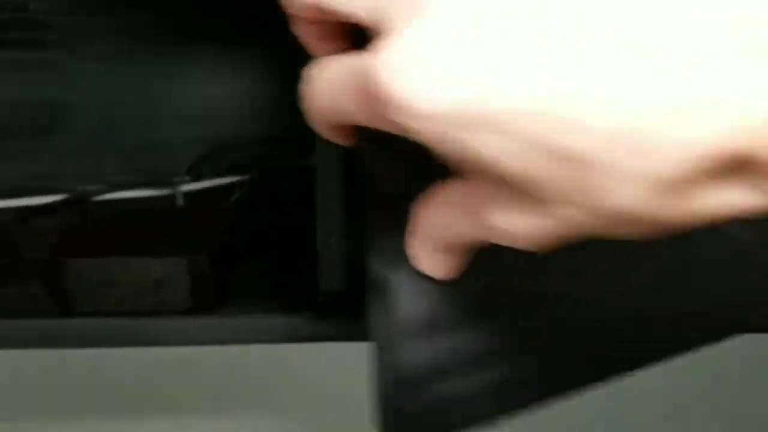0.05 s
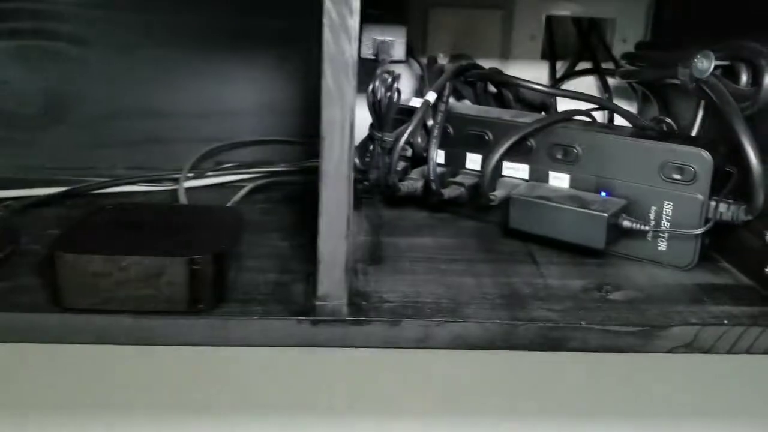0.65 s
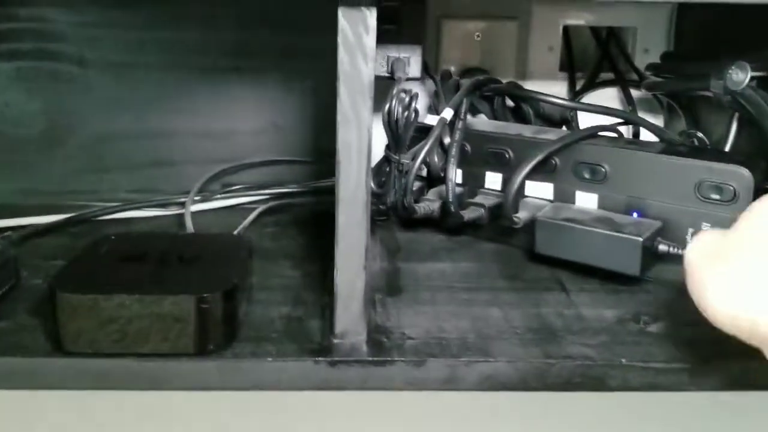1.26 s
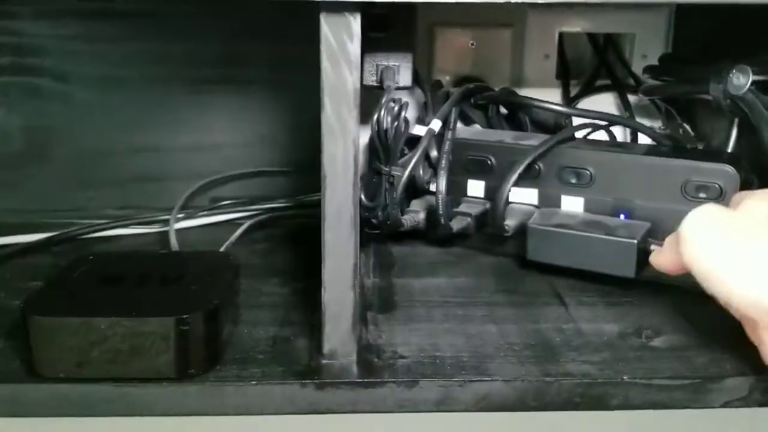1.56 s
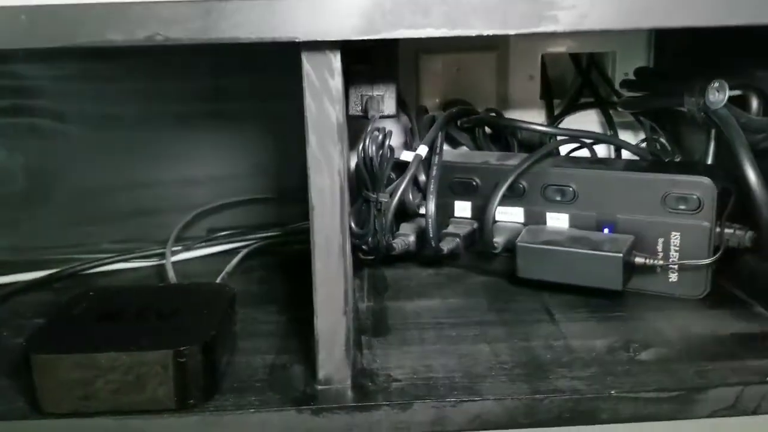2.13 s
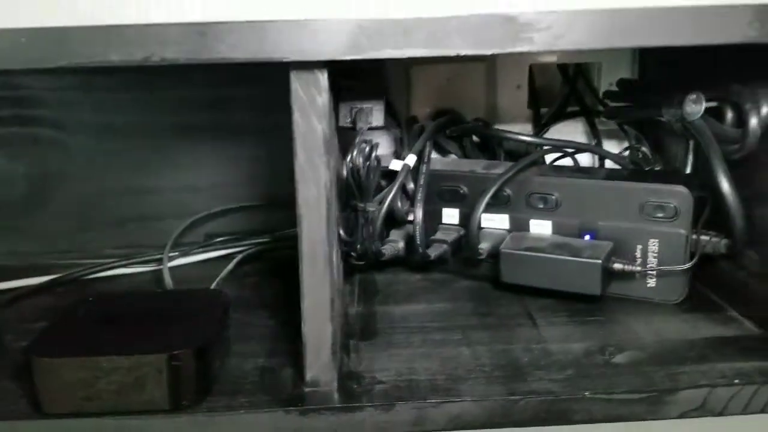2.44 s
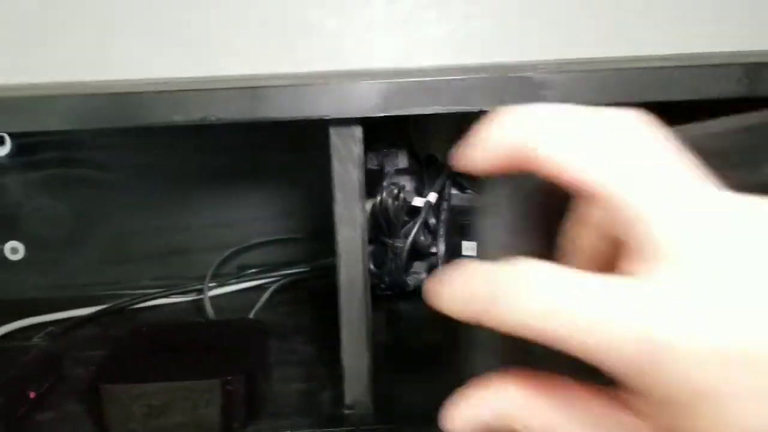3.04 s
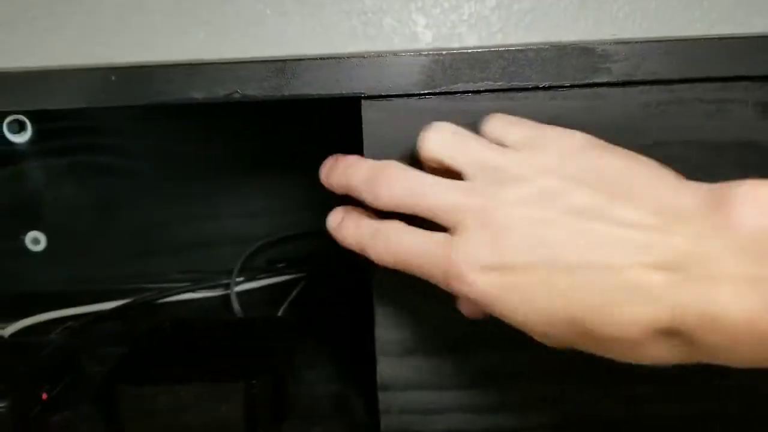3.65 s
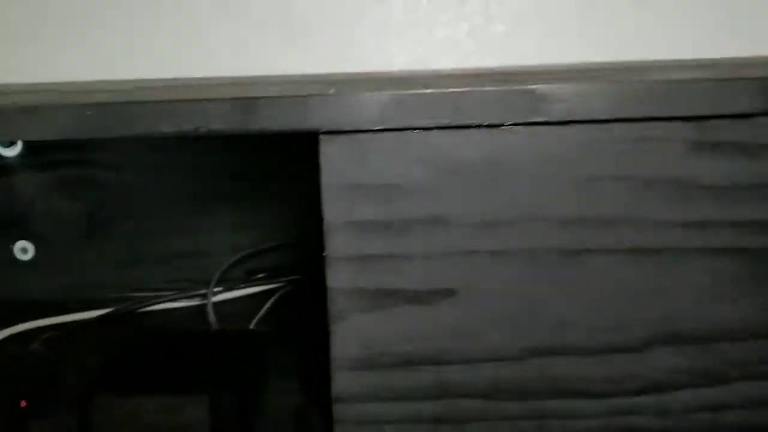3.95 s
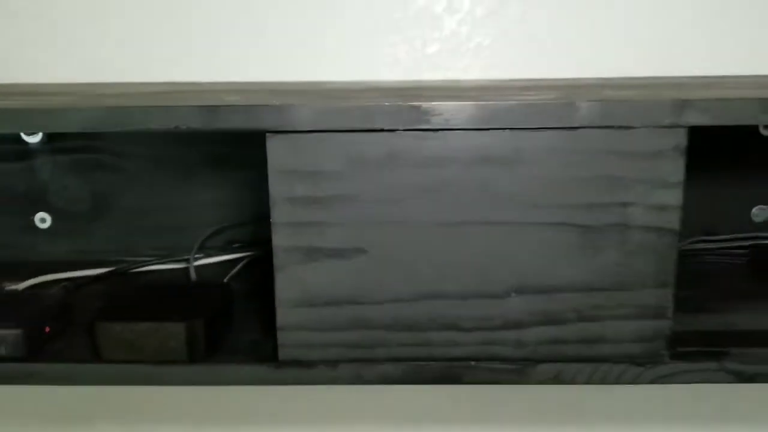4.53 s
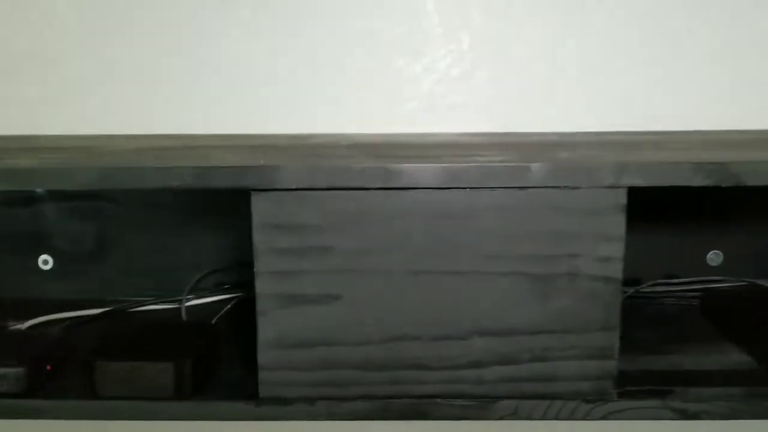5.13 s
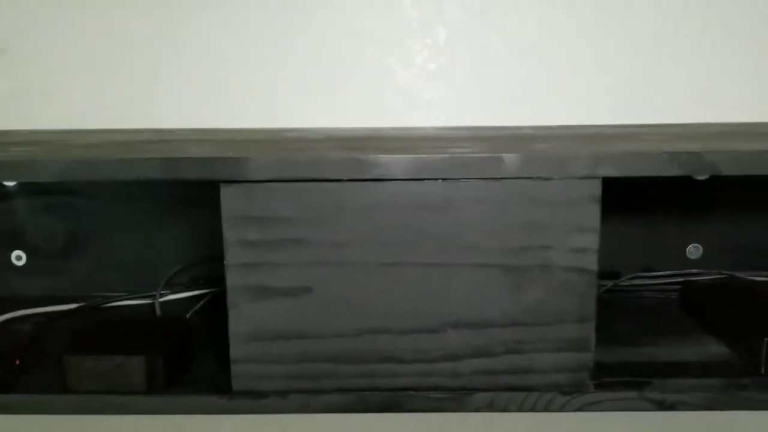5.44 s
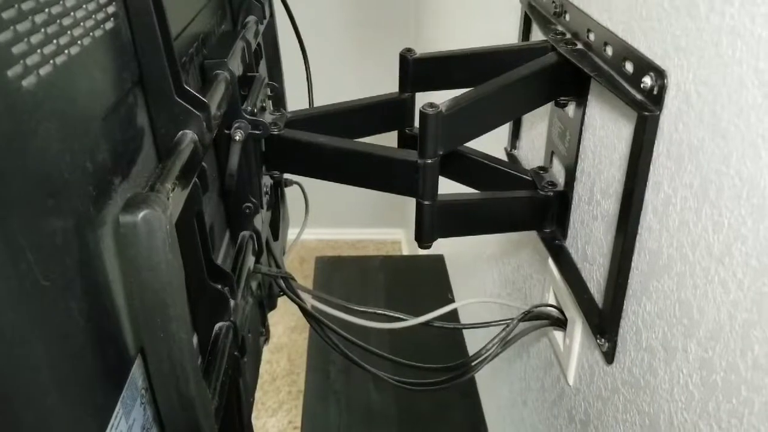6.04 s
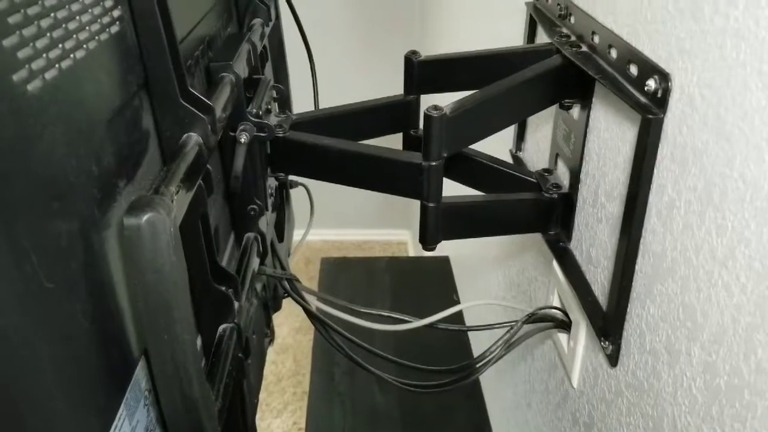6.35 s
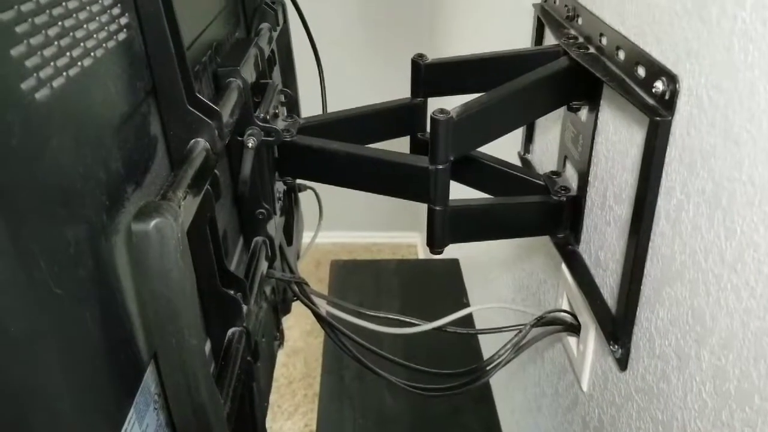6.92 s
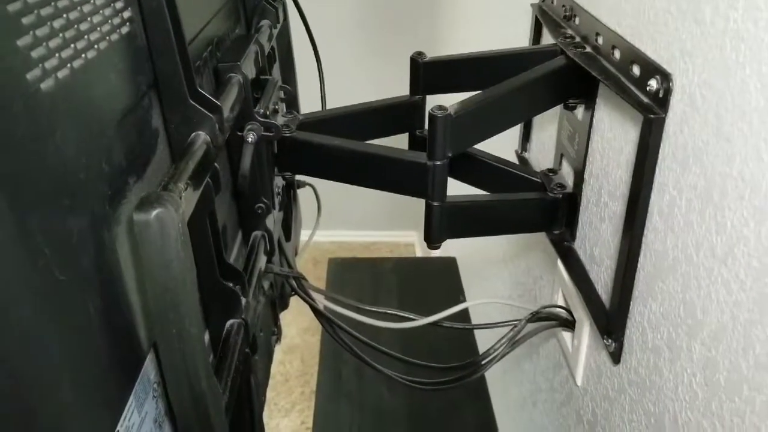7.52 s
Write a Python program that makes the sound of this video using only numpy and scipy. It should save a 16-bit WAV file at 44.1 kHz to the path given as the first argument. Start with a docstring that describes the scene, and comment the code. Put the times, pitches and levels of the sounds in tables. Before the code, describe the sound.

A steady low mains hum fills a small furnished room. Over it come light taps and scrapes of a wooden cabinet cover, a few crisp plastic clicks and the brush of a hand. The cover closes with one loud knock about halfway, followed by a few faint bumps. The hum then grows fuller, and a finger slides over the recording device and taps it sharply, very close on the left.

```python
"""Cabinet panel and mains hum

A wooden cover panel is lifted off a low cabinet, knocking and scraping, and a power brick and its cables
are nudged with hard plastic clicks. One sharp knock pushes the panel home. Mains hum fills the small
room, sinks behind the closed panel and later jumps up. Near the end a fingertip slides and taps on the
hand-held phone, right beside its left microphone."""
import sys
import numpy as np
from scipy import signal
from scipy.fft import rfft, irfft
from scipy.io import wavfile
from scipy.ndimage import uniform_filter1d, minimum_filter1d

SR = 44100
rng = np.random.default_rng(int(sys.argv[2]) if len(sys.argv) > 2 else 0)


def unload_wav(signal):
    """Save mono or channel-first audio to the path in sys.argv[1] as 16-bit WAV at rate SR, clipped to [-1, 1]."""
    wavfile.write(
        sys.argv[1],
        SR,
        np.round(np.clip(np.atleast_2d(signal).T, -1, 1) * 32767).astype(np.int16),
    )


N = 343098
T = np.arange(N) / SR
RING = T[:SR * 3 // 4]  # time axis of one ring-out
CLICK_T60 = 0.028

# panel or brick dragged over wood, rising and falling by 20 dB in the times given; the short row at 0.568 s is
# the brief scrape and ring that goes with the knock there: # peak_s, rise_s, fall_s, scrape_db, resonance_hz,
# resonance_db
DRAGS = [(.005, 3.5, 0.26, -43, 720, -52.5), (.388, 0, .2, -47, 1130, -45),
         (0.568, 0.0332, 0.02, -43.5, 674, -28.5), (.94, 0.2, 0.2, -74.5, 4200, -66.5),
         (1.111, 0.1, 0.02, -48, 2870, -52), (1.419, 0.0868, 0.2257, -36, 980, -39),
         (1.51, 0.09, 0.23, -40.5, 778, -41), (1.55, 0.08, 0.23, -45.5, 1773, -47),
         (2.429, 0.1, .15, -49.5, 1220, -61), (2.69, 0.3, 0.36, -49, 1114, -53.5),
         (2.82, 0.16, 0.36, -49.5, 2920, -53), (3, 0.36, 0.66, -49, 1900, -56),
         (4.86, .2, .12, -64, 349, -57.5), (5.5, 0.5, .4, -71, 1600, -65)]
# hiss of sliding skin: freq_hz, level_db
SKIN_EQ = [(1000, -20.5), (3500, -1.5), (6800, -2.5), (8800, -11.5), (12000, 5), (15500, -8)]


def panel(seated_s=3.45, modes_db=5, spot_db=1.5, snap_db=12, click_db=2, body_t60=0.07):
    """Each blow bends the panel, rings its higher modes and a blur of short ones, and clicks the edge."""
    # modes of the panel in its frame: pitch_hz, level_db, t60_s
    panel_modes = [(118, -1, 0.17), (132, -4, 0.17), (198.5, -2, 0.19), (243, -10, 0.2), (300, -25, 0.13),
                   (489, -1.5, 0.08), (525, -9.5, 0.1), (623, -18, .15), (673, -10, 0.12), (696, -14, 0.04),
                   (1014, -16, .2), (1150, -19.5, 0.18), (1237, -13, 0.16), (1300, -24, 0.15),
                   (2000, -18, 0.18), (2027, -18.5, 0.18), (2110, -23, .17), (2336, -22, .2),
                   (2960, -26, 0.2), (3203, -21, 0.2), (3332, -22, 0.2), (3433, -21, 0.17),
                   (5310, -13.5, 0.035), (5512, -19, .06)]
    # blows on the wood: start_s, strength_db, favoured_hz, edge_db
    blows = [(0.332, -37, 760, -60), (.385, -39.5, 1210, -51), (.528, -32.5, 1480, -37.5),
             (.541, -34.5, 895, -33.5), (.566, -26, 610, -54), (.594, -37, 300, -70),
             (1.112, -31.5, 325, -35.5), (1.146, -32.5, 1910, -34), (1.155, -30.5, 260, -42),
             (1.934, -48, 800, -57), (2.389, -32.5, 141, -41.5), (2.422, -40, 606, -47.5),
             (2.714, -48, 800, -64.5), (2.815, -41.5, 2000, -40), (2.832, -45, 196, -51),
             (3.002, -39.5, 199.6, -67.5), (3.141, -46, 548, -64), (3.152, -31, 207, -68.5),
             (3.4612, -15.5, 3758, -21), (3.4622, -13.5, 400, -31.5), (3.4657, -15.5, 1100, -26),
             (3.493, -26.5, 3010, -39.5), (4.823, -44, 280, -57), (4.861, -43, 326, -52),
             (4.886, -41, 330, -50), (4.887, -45.5, 3300, -51)]
    # woody body of a knock: freq_hz, level_db
    wood_eq = [(150, -11), (230, 2), (340, -11), (520, 1), (690, 8), (800, -5), (900, -9), (1220, 2.5),
               (1650, -8), (2100, -3), (2600, -11.5), (4000, -13), (8000, -30), (15000, -39)]
    # bright click of the edge: freq_hz, level_db
    edge_eq = [(400, -35.5), (1200, 1.5), (3300, 6.5), (4400, 4), (5400, 4.5), (7000, -2), (8800, -17.5),
               (12000, -2), (15500, -14)]
    out = np.zeros((2, N))
    hz, db, t60 = np.transpose(panel_modes)
    wood_hz, wood_db = np.transpose(wood_eq)
    bending = hz < 160
    swing = np.array([fade(t) for t in t60]) * np.exp(2j * np.pi * np.outer(hz, RING))
    snap = colour(signal.unit_impulse(len(RING)), edge_eq)
    snap = undb(snap_db) * snap / np.abs(snap).max()
    for start_s, strength_db, favoured_hz, edge_db in blows:
        spot, side = rng.standard_normal((2, len(hz)))
        force_db = strength_db + 40  # above a light blow
        # a light blow wakes only the modes near its own pitch, a hard one wakes them all
        focus_db = 8 - 0.16 * force_db
        ring_db = strength_db + modes_db + spot_db * spot + favour(hz, favoured_hz, focus_db)
        # the softer and heavier the blow, the more it bends the whole panel
        thump_db = strength_db - 5.5 - 6.5 * np.log2(favoured_hz / 250) + 0.7226 * force_db
        gain = undb(db + np.where(bending, thump_db, ring_db))
        # shorter waves reach the two microphones out of step
        lag = np.minimum(hz / 1000, 1) * np.sign(side) * np.pi / 4
        ringing = np.imag((gain * np.exp(1j * np.array([lag, -lag]))) @ swing)
        # the hand damps the panel until it sits in its frame
        grip = undb(-1) * fade(t60=0.4) if start_s < seated_s else 1
        add(out, start_s, grip * ringing)
        body_eq = np.column_stack([wood_hz, wood_db + favour(wood_hz, favoured_hz, focus_db=6)])
        add(out, start_s, undb(strength_db) * burst(body_eq, body_t60))
        add(out, start_s, undb(edge_db) * (snap + undb(click_db) * burst(edge_eq, CLICK_T60)))
    # a small panel radiates almost nothing below its first mode
    return signal.sosfilt(signal.butter(4, 90, "high", fs=SR, output="sos"), out)


def finger(tap_s=7.443, tap_db=-5, tap_t60=0.0047, ring_db=-35, ring_t60=0.21, leak_db=-24):
    """Skin drags over the phone's case and taps it once; almost all of it enters the left microphone."""
    # fingertip strokes: middle_s, length_s, level_db, relative_hiss_db
    strokes = [(7.117, 0.062, -41, -5.5), (7.194, .26, -57.5, -2), (7.272, 0.067, -41, -10),
               (7.335, 0.12, -43.5, 3.5), (7.377, 0.079, -33.5, -9), (7.59, 0.28, -43.5, -15.5)]
    # the case when rubbed: freq_hz, level_db
    rub_eq = [(400, -27), (900, -16.5), (1500, -7), (2300, -6.5), (3700, -2.5), (5200, -6.5), (7000, -17),
              (9000, -22.5), (15500, -37.5)]
    # attack of the tap: freq_hz, level_db
    tap_eq = [(200, -2), (700, -20), (1500, 16.5), (2400, -11.5), (3600, 8.5), (5500, -13), (8500, -33),
              (15000, -14.5)]
    # short ring of the case after the tap: freq_hz, level_db
    ring_eq = [(500, -25), (1600, -3), (2400, -12), (3600, 0), (5000, -11), (8000, -30), (15000, -29)]
    out = np.zeros((1, N))
    slips = rng.standard_normal((2, N)) * undb(0.5 * walk(600) + 0.6 * walk(90))
    rub = unit(colour(slips[0], rub_eq))
    hiss = unit(colour(slips[1], SKIN_EQ))
    for middle_s, length_s, db, hiss_db in strokes:
        near, gain = arch(middle_s, length_s)
        out[:, near] += undb(db) * gain * (rub[:, near] + undb(hiss_db) * hiss[:, near])
    tap = colour(signal.unit_impulse(len(RING)), tap_eq) * fade(tap_t60)
    case_ring = burst(ring_eq, ring_t60)[:1]
    add(out, tap_s, undb(tap_db) * tap / np.abs(tap).max() + undb(ring_db) * case_ring)
    return out * np.array([[1], [undb(leak_db)]])


def plastic_clicks():
    """Hard plastic shells click and damp quickly."""
    # the power brick, its plugs and the phone's case: start_s, level_db
    click_cues = [(.812, -51.5), (1.401, -21), (1.419, -28), (1.491, -43), (1.533, -39), (1.688, -41.5),
                  (1.712, -39.5), (6.265, -46.5)]
    # tone of hard plastic: freq_hz, level_db
    plastic_eq = [(300, -63), (900, -5.5), (1600, 7.5), (3500, 3), (6500, 0.5), (8800, -15), (12000, 2),
                  (15500, -11)]
    out = np.zeros((2, N))
    for start_s, db in click_cues:
        add(out, start_s, undb(db) * burst(plastic_eq, CLICK_T60))
    return out


def rubbing(grain_db=0.5, catch_db=3, skin_grain_db=3):
    """Tiny slips, bunched where the surfaces catch, sound through the wood; skin adds a fine hiss."""
    # tone of scraped wood: freq_hz, level_db
    scrape_eq = [(100, -10.5), (300, 3), (700, -1), (1150, 1), (1600, -5.5), (2900, -4), (4200, -8.5),
                 (6500, -16.5), (8800, -28.5), (15000, -21)]
    # skin brushing over wood and cables: middle_s, length_s, level_db
    brushes = [(.04, 0.47, -65.5), (0.39, 0.35, -62.5), (0.642, 0.39, -66), (1.12, 0.08, -46.5),
               (1.544, 0.59, -55), (1.83, 0.13, -54), (2.252, 0.083, -60), (2.4, 0.043, -48.5),
               (2.513, .12, -59.5), (2.646, 0.22, -52), (3.048, 1, -64), (3.405, 0.14, -56.5),
               (4.863, 0.204, -64.5), (6.256, .035, -57), (7.05, .2, -64)]
    slips = two_ports(N) * undb(grain_db * walk(900) + catch_db * walk(55))
    scrape = unit(colour(slips, scrape_eq))
    skin_slips = two_ports(N) * undb(skin_grain_db * walk(500))
    hiss = unit(colour(skin_slips, SKIN_EQ))
    scrape_power, brush_power = np.zeros((2, N))
    for peak_s, rise_s, fall_s, db, _, _ in DRAGS:
        near, gain = push(peak_s, rise_s, fall_s)
        scrape_power[near] += (undb(db) * gain) ** 2
    for middle_s, length_s, db in brushes:
        near, gain = arch(middle_s, length_s)
        brush_power[near] += (undb(db) * gain) ** 2
    return scrape * np.sqrt(scrape_power) + hiss * np.sqrt(brush_power)


def scuffs(grain_db=3, catch_db=1.5, q=3.8):
    """The uneven slips of each drag also sing in one narrow resonance."""
    out = np.zeros((2, N))
    slips = two_ports(N) * undb(grain_db * walk(150) + catch_db * walk(35))
    for peak_s, rise_s, fall_s, _, hz, db in DRAGS:
        near, gain = push(peak_s, rise_s, fall_s)
        resonance = signal.iirpeak(hz, q, SR)
        singing = signal.lfilter(*resonance, signal.lfilter(*resonance, slips[:, near]))
        out[:, near] += undb(db) * gain * unit(singing)
    return out


def hum(mains_hz=59.98, waver_db=0.5, buzz_waver_db=2, lag_rad=0.15):
    """Magnetic hum at twice the mains frequency, faint buzz, a small fan, and air rumbling and hissing."""
    # fader moves; body rides the 60 and 240 Hz partials and the rumble, buzz also rides the fan:
    # time_s, hum_db, body_db, air_db, left_minus_right_db, buzz_db
    fader_moves = [(0, -37.5, -25, 2.5, 3, 3.5), (3.45, -37, -25.5, 3, 3, 3.5),
                   (3.8, -39.5, -28, 3, 3.5, 0.5), (4.6, -41.5, -22, 1, 5.5, 1),
                   (6.255, -41.5, -22, 2, 6.5, 0.5), (6.275, -36, -15.5, -0.5, -2.5, -3.5),
                   (7.8, -35.5, -15.5, 6, -1.5, 1)]
    # upper buzz: mains_harmonic, level_db
    buzz_partials = [(3, -66.5), (5, -71.5), (6, -70), (8, -70.5), (10, -71), (12, -69), (14, -73)]
    # whirr of the fan: freq_hz, level_db
    fan_eq = [(300, -30), (560, -3), (780, 0), (900, -8.5), (1150, -30), (4000, -60)]
    # hiss of moving air: freq_hz, level_db
    air_eq = [(25, -10), (70, 3.5), (200, -1), (400, -8.5), (750, -15.5), (1100, -21), (2000, -23.5),
              (4200, -26), (6500, -24.5), (8700, -40), (11500, -24.5), (15500, -36)]
    # rumble of moving air: freq_hz, level_db
    rumble_eq = [(25, -26), (60, 6.5), (130, -6), (260, -9.5), (450, -19), (900, -30.5), (3000, -64.5)]
    hum_db, body_db, air_db, pan_db, buzz_db = curve(fader_moves)
    sides = np.array([[1], [-1]]) / 2
    phase = 2 * np.pi * mains_hz * T + lag_rad * sides
    tone = np.sin(2 * phase) * undb(pan_db * sides)
    tone += undb(body_db) * (undb(-4) * np.sin(phase) + np.sin(4 * phase))
    buzz = np.zeros((2, N))
    for harmonic, db in buzz_partials:
        # the highest partials are the first to go with distance
        level_db = db + buzz_db * harmonic / buzz_partials[-1][0] + buzz_waver_db * walk(3)
        buzz += undb(level_db) * np.sin(harmonic * phase + rng.uniform(0, 2 * np.pi))
    fan = noise_bed(fan_eq) * undb(-70 + buzz_db)
    air = noise_bed(air_eq) * undb(-57.5 + air_db + 0.5 * walk(3))
    rumble = noise_bed(rumble_eq) * undb(-33 + body_db)
    tone *= undb(hum_db + waver_db * walk(4.5))
    return np.sqrt(2) * (tone + buzz) + fan + air + rumble


def room(x, wet_db=-10, low_t60=0.5, high_t60=0.32, split_hz=3000, build_s=0.0083):
    """A small furnished room adds a diffuse tail whose treble dies first."""
    noise = two_ports(len(RING))
    noise = signal.sosfilt(signal.butter(2, 280, "high", fs=SR, output="sos"), noise)
    low = signal.sosfilt(signal.butter(1, split_hz, fs=SR, output="sos"), noise)
    tail = (low * fade(low_t60) + (noise - low) * fade(high_t60)) * (1 - np.exp(-RING / build_s))
    tail = unit(tail) / np.sqrt(len(RING))
    return x + undb(wet_db) * signal.fftconvolve(x, tail, axes=1)[:, :N]


def favour(hz, favoured_hz, focus_db):
    """Place and softness of a contact favour one pitch; a mode an octave away loses focus_db."""
    return -focus_db * np.abs(np.log2(hz / favoured_hz)) ** 1.5


def push(peak_s, rise_s, fall_s):
    """Samples and gain of a drag that builds to its hardest push and dies away."""
    near = slice(*np.searchsorted(T, [peak_s - 2 * rise_s, peak_s + 2 * fall_s]))
    return near, 10 ** -np.maximum((peak_s - T[near]) / rise_s, (T[near] - peak_s) / fall_s)


def arch(middle_s, length_s, steepness=1.3):
    """Samples and gain of a stroke that speeds up and slows down."""
    near = slice(*np.searchsorted(T, [middle_s - length_s / 2, middle_s + length_s / 2]))
    return near, np.abs(np.cos(np.pi * (T[near] - middle_s) / length_s)) ** steepness


def two_ports(length, apart_hz=850):
    """Noise at two close microphones: alike in the bass, unrelated in the treble."""
    mid, side = rfft(rng.standard_normal((2, length)))
    alike = 1 / (1 + (np.fft.rfftfreq(length, 1 / SR) / apart_hz) ** 2)
    mid, side = mid * np.sqrt((1 + alike) / 2), side * np.sqrt((1 - alike) / 2)
    return irfft([mid + side, mid - side], length)


def colour(x, eq, size=4096):
    """Minimum-phase EQ through (freq_hz, level_db) points."""
    hz, db = np.transpose(eq)
    bin_hz = np.maximum(np.fft.rfftfreq(size, 1 / SR), 1)
    gain = undb(np.interp(np.log(bin_hz), np.log(hz), db))
    cepstrum = irfft(np.log(gain))
    cepstrum[1:size // 2] *= 2
    cepstrum[size // 2 + 1:] = 0
    impulse = irfft(np.exp(rfft(cepstrum)))
    return signal.fftconvolve(np.atleast_2d(x), impulse[None], axes=1)[:, :x.shape[-1]]


def noise_bed(eq, length=N):
    """Steady coloured stereo noise at rms 1."""
    return unit(colour(two_ports(length), eq))


def burst(eq, t60):
    """Coloured noise that starts at rms 1 and dies away."""
    return noise_bed(eq, len(RING)) * fade(t60)


def fade(t60):
    """Exponential decay, 60 dB in t60 seconds."""
    return np.exp(-np.log(1000) * RING / t60)


def walk(rate_hz):
    """Smooth random wander at rms 1."""
    step = max(int(SR / rate_hz), 1)
    stairs = np.repeat(rng.standard_normal(N // step + 1), step)
    return unit(uniform_filter1d(stairs, step)[:N])


def curve(rows):
    """The columns of a timed table as straight ramps."""
    time_s, *columns = np.transpose(rows)
    return [np.interp(T, time_s, column) for column in columns]


def add(out, start_s, sound):
    """Mix a sound in at its cue."""
    i = int(start_s * SR)
    out[:, i:i + sound.shape[1]] += sound[:, :N - i]


def undb(db):
    """Decibels to gain."""
    return 10 ** (np.asarray(db) / 20)


def unit(x):
    """Scale to rms 1."""
    return x / np.sqrt(np.mean(x ** 2))


def gain_control(x, threshold_db=-16, slope=0.22, hold_s=0.99, glide_s=0.59):
    """A loud peak ducks the gain, which holds and then glides back."""
    hold, glide = int(hold_s * SR), int(glide_s * SR)
    wanted = np.minimum(1, undb(threshold_db) / (np.abs(x).max(axis=0) + 1e-9)) ** slope
    held = minimum_filter1d(wanted, hold, origin=(hold - 1) // 2, mode="nearest")
    return x * uniform_filter1d(held, glide, origin=(glide - 1) // 2, mode="nearest")


def scene():
    """Cabinet sounds in the room, with the hum and the close fingertip left dry."""
    return room(panel() + plastic_clicks() + rubbing() + scuffs()) + hum() + finger()


def record(dry):
    """The phone: a brighter right microphone, gain control, clipping and a steep top cut."""
    # left microphone port: freq_hz, gain_db
    left_eq = [(1000, -2), (4500, -3), (7000, 1), (11000, -7), (15500, -9)]
    # right microphone port: freq_hz, gain_db
    right_eq = [(1000, -3), (4500, -3), (7000, 4), (11000, 3), (15500, 1)]
    ports = np.vstack([colour(dry[0], left_eq), colour(dry[1], right_eq)])
    top_cut = signal.ellip(10, 0.2, 80, 15900, fs=SR, output="sos")
    return signal.sosfilt(top_cut, np.clip(gain_control(ports), -1, 1))


dry = scene()
out = record(dry)
unload_wav(out)
```